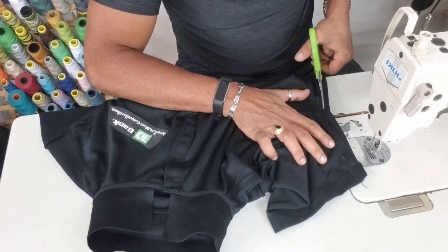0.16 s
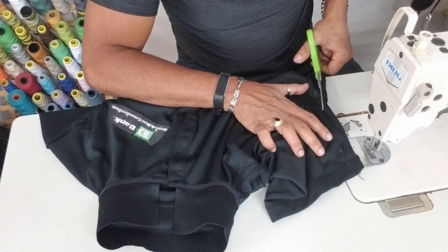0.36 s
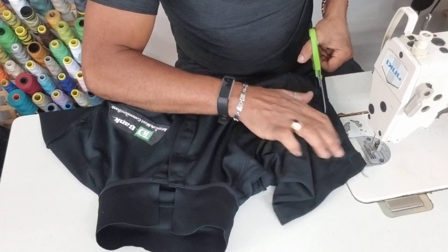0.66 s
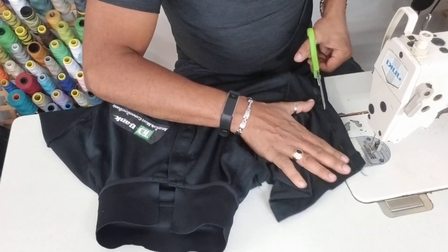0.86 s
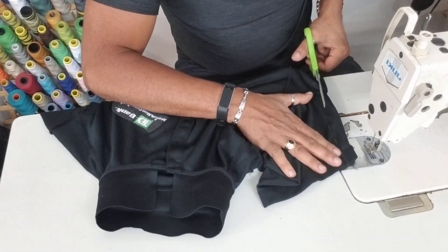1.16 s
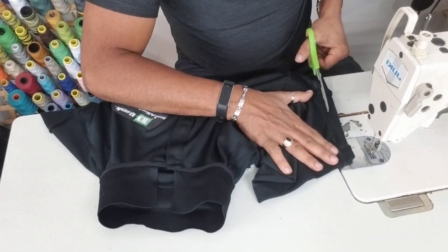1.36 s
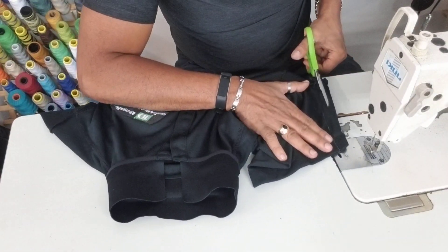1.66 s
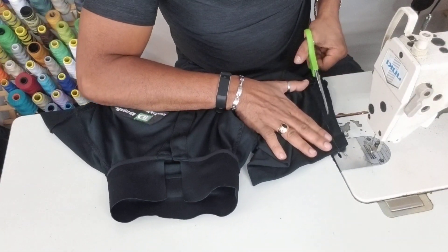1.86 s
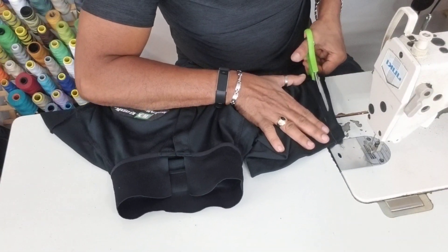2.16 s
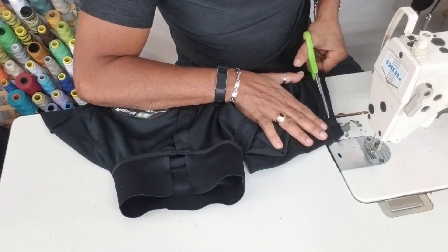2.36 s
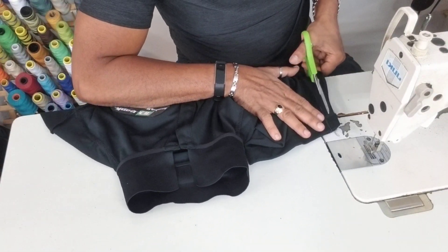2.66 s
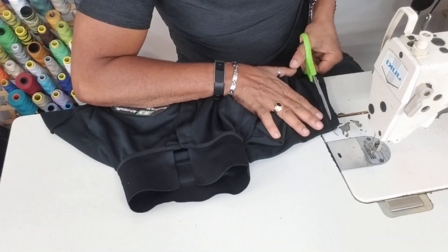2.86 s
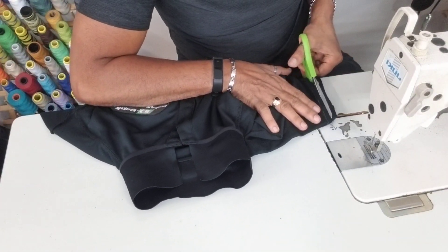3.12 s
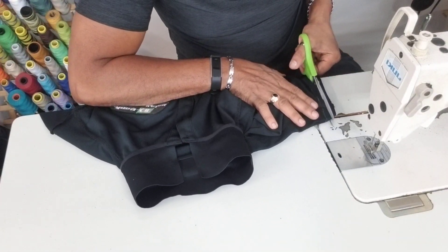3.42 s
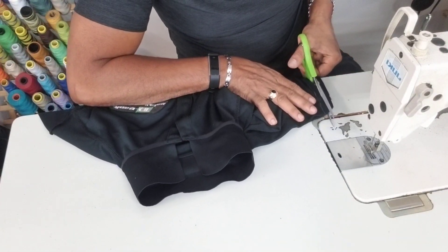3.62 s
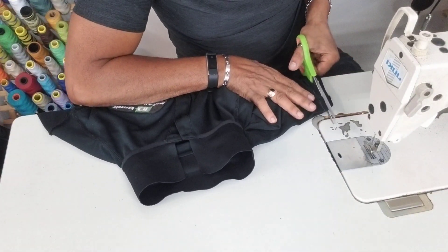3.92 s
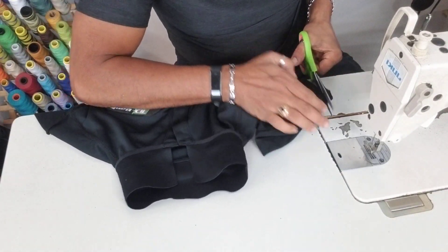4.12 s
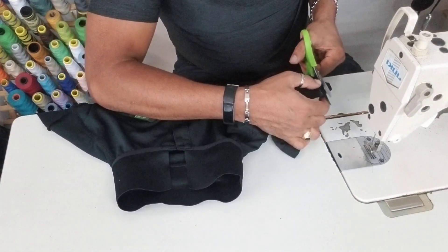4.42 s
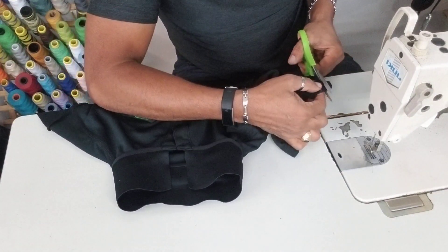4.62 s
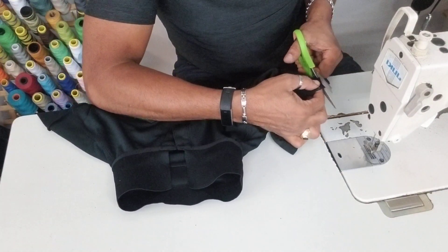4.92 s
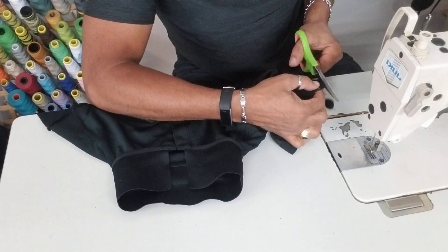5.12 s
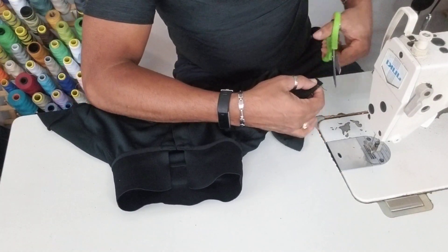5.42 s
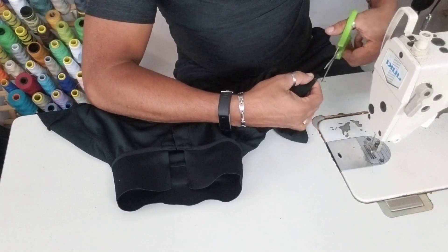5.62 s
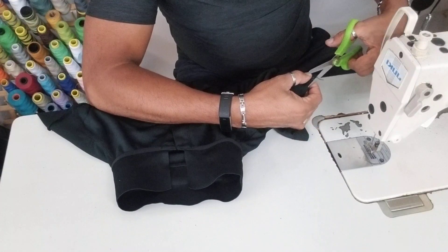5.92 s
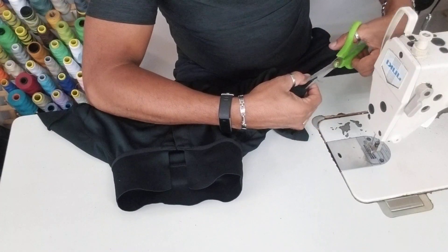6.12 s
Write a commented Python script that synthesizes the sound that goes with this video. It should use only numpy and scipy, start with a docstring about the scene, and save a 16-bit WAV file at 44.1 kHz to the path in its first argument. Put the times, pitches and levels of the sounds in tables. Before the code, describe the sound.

Eight or so crunchy scissor cuts in fabric, spaced about half a second apart, then a lone late snip over steady machine hum.

```python
"""Scissors snipping cloth over a motor and fan

Scissors with plastic handles snip eight times through knit cloth on a sewing table, near a two-port phone.
Sheared threads, caught seams and steel knocks ring table and steel; soft bumps and a small-room tail join.
An idling motor hums at mains multiples and whines at its slot rate, as sine lines with slow waver.
A fan adds a blade tone, a rush of shaped noise and narrow casing resonances."""
import sys
import numpy as np
from scipy import signal
from scipy.fft import rfft, irfft, next_fast_len
from scipy.io import wavfile
from scipy.ndimage import uniform_filter1d

SR = 44100
rng = np.random.default_rng(int(sys.argv[2]) if len(sys.argv) > 2 else 0)


def inscribe(sig):
    """Save sig as 16-bit PCM at rate SR to the path in sys.argv[1].

    A 1-D sig is mono; a 2-D sig holds one channel per row.
    Samples are clipped to [-1, 1] before scaling.
    """
    pcm = np.round(np.clip(np.atleast_2d(sig).T, -1, 1) * 32767)
    wavfile.write(sys.argv[1], SR, pcm.astype(np.int16))


N = 277058
FFT_LEN = next_fast_len(N)
TIME_S = np.arange(N) / SR
OPPOSED = np.array([[1], [-1]])  # left, right


def undb(db):
    """Amplitude gain of a level in dB."""
    return 10 ** (np.asarray(db) / 20)


def unit(x):
    """Scale to rms 1."""
    return x / np.sqrt(np.mean(x ** 2))


def lean(left_minus_right_db):
    """Left and right gains of a level difference, split evenly."""
    return undb(left_minus_right_db / 2 * OPPOSED)


def over_hz(table):
    """Read a (frequency [Hz], value) table at every spectrum bin, on a log frequency axis."""
    hz, value = np.transpose(table)
    bins_hz = np.fft.rfftfreq(FFT_LEN, 1 / SR)
    return np.interp(np.log(bins_hz + 1), np.log(hz), value)


def colour(x, db):
    """Weight the spectrum of x by a level per bin."""
    return irfft(rfft(x, FFT_LEN) * undb(db), FFT_LEN)[..., :N]


def walk(rate_hz):
    """Random levels, rate_hz draws per second, joined by straight slopes; rms 1."""
    step = int(SR / rate_hz)
    held = np.repeat(rng.standard_normal(N // step + 1), step)[:N]
    return unit(uniform_filter1d(held, step))


def pair(mid_weight, side_weight, mid, side):
    """Left and right from a shared and an opposed part."""
    return mid_weight * mid + side_weight * side * OPPOSED


def noises(alike):
    """Two white noises of a given likeness 0-1: one value, or one per spectrum bin."""
    alike = np.clip(alike, 0, 1)
    weights = np.sqrt((1 + alike) / 2), np.sqrt((1 - alike) / 2)
    raw = rng.standard_normal((2, FFT_LEN))
    if alike.ndim:
        return irfft(pair(*weights, *rfft(raw)), FFT_LEN)[:, :N]
    return pair(*weights, *raw)[:, :N]


def ring(x, modes, count=1):
    """Sum of resonances with alternating sign; count 2 filters twice for steeper flanks."""
    out = 0
    for k, (hz, width_hz, db) in enumerate(modes):
        b, a = signal.iirpeak(hz, hz / width_hz, SR)
        out = out + (-1) ** k * undb(db) * signal.sosfilt([[*b, *a]] * count, x)
    return out


def tone(hz, left_db, right_db, lead_rad=0., waver_db=0.5):
    """Sine at both ports, left leading by lead_rad, its level wavering in common."""
    phase = 2 * np.pi * (hz * TIME_S + rng.random())
    left = undb(left_db) * np.sin(phase + lead_rad)
    right = undb(right_db) * np.sin(phase)
    return np.sqrt(2) * undb(waver_db * walk(9)) * np.array([left, right])


# air rush spectrum, relative: (frequency [Hz], level per Hz [dB])
RUSH_SPECTRUM = [(25, -17), (50, -15), (90, -9.5), (150, -7), (280, -8), (640, -8.5), (850, -17.5),
                 (1050, -17), (1900, -20.5), (2400, -22.5), (2950, -25.5), (4200, -24.5), (6300, -27),
                 (8200, -33.5), (13500, -32), (16000, -40)]
# rush likeness of the ports: (frequency [Hz], likeness [0-1])
RUSH_LIKENESS = [(40, .2), (90, .75), (150, .9), (300, .93), (640, .75), (900, .52), (1600, .42),
                 (2200, .1), (16000, 0)]
# casing resonances, before port balance: (frequency [Hz], width [Hz], level [dB])
CASING_MODES = [(310.5, 15, -53), (366.6, 14, -58), (455.7, 16.2, -50), (578, 16.7, -55), (1011, 32, -66),
                (1569, 17, -69)]
# port balance of the fan noise: (frequency [Hz], left minus right [dB])
PORT_BALANCE = [(60, -14.5), (110, 11), (200, 0.5), (380, -1), (700, -2), (1290, -2), (2380, -3),
                (4400, -4), (8120, 2.5), (15000, 10)]
RUSH_DB = -46.5  # rms before port balance
FAN_HZ, FAN_LEFT_DB, FAN_RIGHT_DB = 185.0, -57.5, -53


def fan():
    """Blade tone, broad air rush and the narrow casing resonances that the air excites."""
    shaped = unit(colour(noises(over_hz(RUSH_LIKENESS)), over_hz(RUSH_SPECTRUM)))
    rush = undb(RUSH_DB + 0.63 * walk(3.05)) * shaped
    rush[0] = np.roll(rush[0], shift=10)  # samples; the fan stands nearer the right port
    casing = 0
    for hz, width_hz, db in CASING_MODES:
        casing = casing + undb(db) * unit(ring(noises(0.82), [(hz, width_hz, 0)]))
    air = colour(rush + casing, over_hz(PORT_BALANCE) / 2 * OPPOSED)
    return air + tone(FAN_HZ, FAN_LEFT_DB, FAN_RIGHT_DB)


# hum lines, before swell or rise: (multiple of mains, left [dB], right [dB], left lead [rad])
HUM_LINES = [(1, -68, -54, -.3), (2, -45.5, -46, -.1), (3, -64, -64, -.9), (4, -48, -49, .1),
             (6, -60, -60, 0), (11, -64, -66, -2), (12, -78, -64, -1.4), (13, -76, -70, -2.1),
             (21, -78, -70, -2.1)]
# whine lines: (multiple of slot rate, mains multiples beside it, left [dB], right [dB], left lead [rad])
WHINE_LINES = [(1, -2, -68, -67.5, 1.5), (1, 0, -88, -92, 1), (1, 2, -62, -69, 1.54), (1, 4, -73, -62.5, 1),
               (2, -6, -63, -73, -2.5), (2, -4, -69.5, -61, 6), (2, -3, -67.5, -82, -11),
               (2, -2, -61.5, -62, 2.13), (2, 0, -56, -55.5, -0.1), (2, 2, -106, -63, 25)]
# swell and lean of all hum lines but the lowest: (time [s], level [dB], left minus right [dB])
HUM_SWELL = [(0, -0.5, -1), (.6, -3, -0.5), (1.3, -2, -0.5), (1.7, -4.5, 0.5), (2.5, -2, -0.5),
             (3.1, -0.5, -1.5), (3.7, 0.5, -0.5), (4.5, -2, -1), (5.3, -3.5, 2.5), (5.9, -3.5, -2.5),
             (6.28, -2, 1)]
MAINS_HZ, SLOT_HZ = 59.96, 2154.55
LOWEST_START_DB, LOWEST_RISE_DB_PER_S = -2, 0.72  # added to the lowest hum line


def motor():
    """Mains hum that swells, and the slot whine with its mains sidebands."""
    lowest, *upper = [tone(k * MAINS_HZ, *rest, waver_db=1.2) for k, *rest in HUM_LINES]
    time_s, swell_db, pan_db = np.transpose(HUM_SWELL)
    left_db = np.interp(TIME_S, time_s, swell_db + pan_db / 2)
    right_db = np.interp(TIME_S, time_s, swell_db - pan_db / 2)
    rise = undb(LOWEST_START_DB + LOWEST_RISE_DB_PER_S * TIME_S)
    hum = rise * lowest + undb([left_db, right_db]) * sum(upper)
    whine = sum(tone(k * SLOT_HZ + j * MAINS_HZ, *rest, waver_db=1.23) for k, j, *rest in WHINE_LINES)
    return hum + whine


ROOM_T60_S, ROOM_TREBLE_T60_S, ROOM_DULL_HZ = 0.43, 0.25, 5000.
ROOM_DB = -7  # tail energy re dry sound


def room(x):
    """Dense decaying noise tail, another one at each port; the treble dies sooner."""
    t = TIME_S[:int(.5 * SR)]
    noise = rng.standard_normal((2, len(t))) * np.clip(t / 0.002, 0, 1)  # 2 ms onset
    low = signal.sosfilt(signal.butter(1, ROOM_DULL_HZ, fs=SR, output="sos"), noise)
    low_decay = np.exp(-np.log(1000) * t / ROOM_T60_S)
    treble_decay = np.exp(-np.log(1000) * t / ROOM_TREBLE_T60_S)
    tail = low * low_decay + (noise - low) * treble_decay
    tail = tail / np.sqrt(np.sum(tail[0] ** 2))
    return undb(ROOM_DB) * signal.fftconvolve(x, tail, axes=1)[:, :N]


# hand and scissors on the table: (time [s], level [dB], pitch [Hz], time to peak [ms])
SOFT_BUMPS = [(1.232, -42, 600, 7.5), (1.287, -40, 316, 15), (1.811, -39, 298, 15), (2.289, -42.5, 428, 10),
              (2.765, -42.5, 330, 12), (3.33, -48, 630, 10), (3.625, -45.5, 746, 8.4),
              (3.86, -40, 280, 6.6)]


def bumps():
    """Dull noise bursts around one pitch, alike at both ports."""
    out, noise = np.zeros((2, N)), noises(1.0)
    for s, db, hz, ms in SOFT_BUMPS:
        i, t = int(s * SR), TIME_S[:6000] / (ms / 1000)
        body = unit(ring(noise[:, i:i + 6000], [(hz, 0.43 * hz, 0)], count=2))
        out[:, i:i + 6000] += undb(db) * t * np.exp(1 - t) * body
    return out


# resonances of table and steel, also rung by scissors(): (frequency [Hz], width [Hz], relative level [dB])
TABLE_MODES = [(320, 210, -5.5), (490, 110, -4.5), (630, 83, -8.5), (1006, 130, -1.5), (1150, 133, -2.5),
               (1415, 177, -4), (1770, 400, -10)]
BLADE_MODES = [(2137, 330, -1), (2460, 230, 8), (2996, 510, 0)]
PIVOT_MODES = [(3400, 640, 0.5), (4180, 1300, -1), (4620, 960, -4)]
EDGE_MODES = [(5170, 620, 3.5), (5820, 1140, -1.5), (6670, 790, -1), (7260, 1200, -4)]
TIP_MODES = [(9440, 2450, -8), (10690, 730, -5), (12260, 1800, -3.5), (13330, 960, 2.5), (13810, 1300, 3),
             (15500, 1100, -1.5)]
# steel on steel, drive levels: (time [s], push [dB], crack [dB], left minus right [dB])
STEEL_TICKS = [(0.436, -22, -20, -1), (1.2359, -13.5, -4, 2), (1.2922, -15.5, -4, -3), (2.305, -24, -27, 6),
               (2.34, -30, -28, 1), (3.8184, -18.5, -18, 1), (3.8604, -16, -18, -5), (3.864, -17, -26, -1),
               (5.08, -40, -24, 6)]


def ticks():
    """A short push thumps the table while a one-sample crack rings the steel; the right port gets it first."""
    push, crack = np.zeros((2, 2, N))
    for s, push_db, crack_db, pan_db in STEEL_TICKS:
        i, side = int(s * SR), lean(pan_db)
        push[:, i:i + 16] = -undb(push_db) * side * np.hanning(16)
        crack[0, i + 8], crack[1, i + 4] = -undb(crack_db) * side[:, 0]
    tips = undb(-1.0) * ring(crack, TIP_MODES) * [[1], [.45]]
    steel = 0.5 * crack + tips + ring(crack, BLADE_MODES + PIVOT_MODES + EDGE_MODES)
    thump = 0.24 * push + undb(5.5) * ring(push, TABLE_MODES)
    return steel + thump


# blades, pivot, edges, tips: (level [dB], share of brightness [dB/dB], share of table level [dB/dB])
STEEL_SHARES = [(0, -1.2, 0.3), (0, -0.67, -0.13), (-4, 0.8, 0.013), (2, 0.87, 0.05)]


def share(part, steel_db, table_db, bright_db):
    """Drive level one part takes of an event: part 0 is the table, the others are steel."""
    if part == 0:
        return steel_db + table_db
    db, bright_share, table_share = STEEL_SHARES[part - 1]
    return steel_db + db + bright_share * bright_db + table_share * table_db


# closing strokes, drive levels: (start [s], hardest [s], end [s], steel [dB], table above steel [dB],
# brightness [dB], rasp of the edges [dB])
BLADE_STROKES = [(0.375, 0.415, 0.47, -49, 1, 1, 1.5), (1.165, 1.23, 1.24, -49, 7, -3, 4),
                 (1.24, 1.253, 1.29, -45, -3, 3, 6.5), (1.285, 1.301, 1.367, -44, 4, 0, 5),
                 (1.752, 1.785, 1.82, -48, -3, 0, 5), (1.79, 1.82, 1.87, -46, 1.5, 1, 0),
                 (2.243, 2.285, 2.325, -44, 2, 0, -2), (2.33, 2.34, 2.43, -56, 10, 1.5, -1),
                 (2.717, 2.772, 2.84, -43, 1, -0.5, -2), (3.275, 3.329, 3.388, -43, 4, 0, -2),
                 (3.762, 3.825, 3.845, -54, 6, -4, -3), (3.858, 3.87, 3.925, -49, 8, 4, -2),
                 (5.035, 5.08, 5.115, -49, -19, 8, -4)]
# catches on seams and thick threads, drive levels: (time [s], steel [dB], table above steel [dB],
# brightness [dB], left minus right [dB], length [ms])
SEAM_SNAPS = [(0.4045, -48, 4, 0, -5, 4.7), (0.4257, -48, -2, -1, -4, 4), (0.4354, -36, 3, -3.5, -3, 3.6),
              (1.192, -47, 1, 3, -5, 5.3), (1.218, -42, 9, -1, -3, 8.8), (1.2326, -38, 6, 1, 0, 3.5),
              (1.2357, -27.5, -4, 3.5, 4, 1.4), (1.2375, -31.5, 1, 1, -8, 3.8),
              (1.245, -33, 4, 6.5, -3, 2.3), (1.285, -38.5, 3, -0.5, 5, 8.1),
              (1.292, -37.5, -2, 7.5, -7, 4.4), (1.7803, -45, -4, 1, -3, 3.3), (1.791, -46, -1, -1, 0, 4),
              (1.801, -46, 0, 5, 5, 6), (1.823, -42, 1, -1, 3, 5.5), (1.845, -44, 7, 1, -3, 6),
              (2.2618, -51, 4, 3, 0, 5), (2.283, -44, -2, -3, -2, 4.6), (2.304, -41.5, 11, 1.5, -2, 3.7),
              (2.3387, -45.5, 13, 6, -2, 3.3), (2.735, -54, 11, -2, -2, 4), (2.757, -48, 11, 0, 0, 6),
              (2.773, -43, 8.5, 3, -3, 5.4), (2.797, -50, 17, 4, 1, 3.6), (2.818, -47, 11, 4, -4, 3.3),
              (3.3077, -49.5, 11, -3, 1, 4), (3.328, -48, 1, 0, -2, 3), (3.338, -44, -1, 2, -1, 4),
              (3.353, -51, 2, 4, -5, 4), (3.817, -38, -9, -2.5, 2, 5), (3.86, -33.5, 9.5, -3.5, 0.5, 5.7),
              (5.0305, -51, -4, 3, -1, 3.6), (5.046, -44.5, -13, 4, -1, 6.6), (5.066, -47, -8, 6, -10, 5.6),
              (5.077, -41.5, -11, 3, 6, 3.5)]
ENDS_DB, ROUNDNESS = -15.5, 1.27  # stroke ends re hardest point; 1 peaked, 2 rounded
EDGES_PART = 3


def force(part, pan_db):
    """Drive of one part of scissors or table: threads part in uneven grains, seams in bursts."""
    shear = np.zeros(N)
    for start, hardest, end, *levels, _ in BLADE_STROKES:
        i, j = int(start * SR), int(end * SR)
        away = np.abs(np.interp(TIME_S[i:j], [start, hardest, end], [-1, 0, 1]))
        shear[i:j] += undb(share(part, *levels) + ENDS_DB * away ** ROUNDNESS)
    grain_db = 3.3 * walk(200) + 2.3 * walk(900) - 4.5
    drive = np.tile(uniform_filter1d(shear, size=120) * undb(grain_db), (2, 1))
    for s, *levels, side_db, ms in SEAM_SNAPS:
        i, t = int(s * SR), TIME_S[:2000] / (ms / 1000)
        burst = (1 - np.exp(-t / 0.088)) * np.exp(-t ** 2)
        drive[:, i:i + 2000] += undb(share(part, *levels)) * lean(side_db) * burst
    if part == EDGES_PART:  # rasp glides from stroke to stroke, catches included
        hardest_s, rasp_db = np.array(BLADE_STROKES).T[[1, 6]]
        drive = drive * undb(np.interp(TIME_S, hardest_s, rasp_db))
    return drive * lean(pan_db)


def scissors():
    """Noise under each drive rings its part; the ports agree well on the table, little on the steel."""
    # (modes, likeness [0-1], left minus right [dB]), in part order
    parts = [(TABLE_MODES, .75, .6), (BLADE_MODES, .3, 3.5), (PIVOT_MODES, .2, .6),
             (EDGE_MODES, .05, 1.5), (TIP_MODES, .1, 8.5)]
    out = 0
    for part, (modes, alike, pan_db) in enumerate(parts):
        noise = noises(alike)
        steady_rms = np.std(ring(noise[0, :SR], modes, count=2))
        out = out + ring(force(part, pan_db) * noise, modes, count=2) / steady_rms
    return out


def scene():
    """Snips with their room tail over motor and fan."""
    snips = scissors() + ticks() + bumps()
    return snips + room(snips) + motor() + fan()


TOP_HZ = 15750


def record(dry):
    """The phone cuts the top: steep elliptic low-pass."""
    return signal.sosfilt(signal.ellip(10, .2, 70, TOP_HZ, fs=SR, output="sos"), dry)


dry = scene()
out = record(dry)
inscribe(out)
```